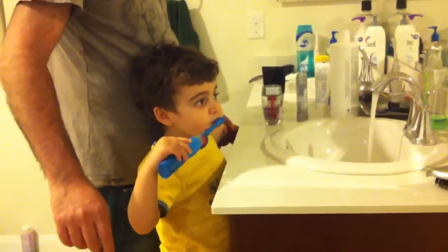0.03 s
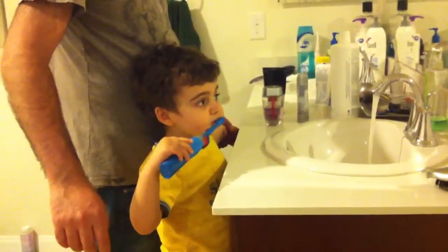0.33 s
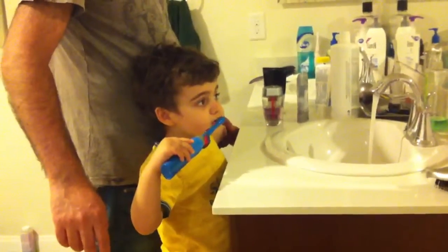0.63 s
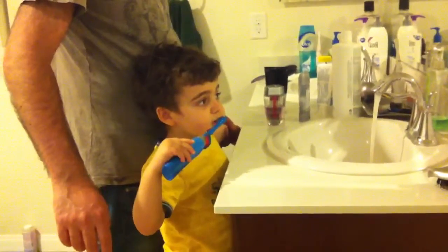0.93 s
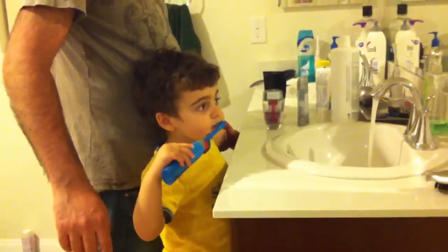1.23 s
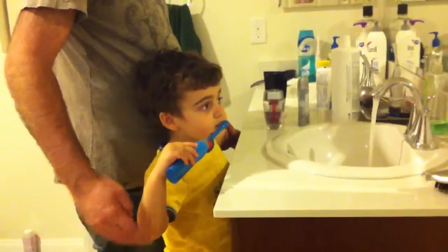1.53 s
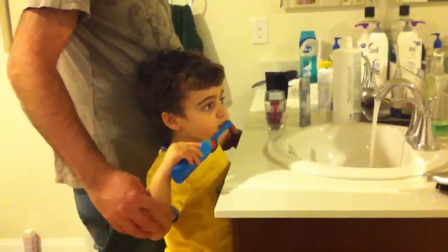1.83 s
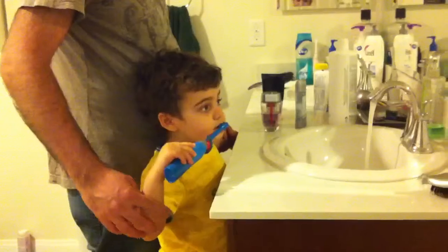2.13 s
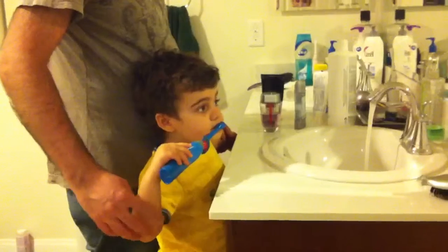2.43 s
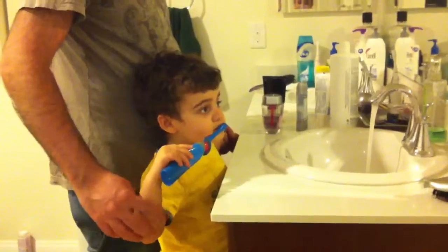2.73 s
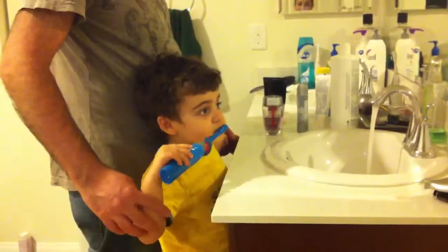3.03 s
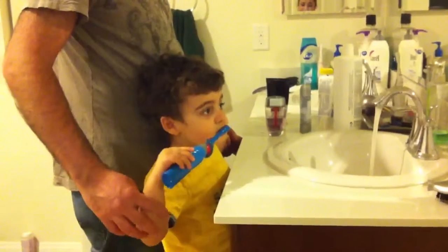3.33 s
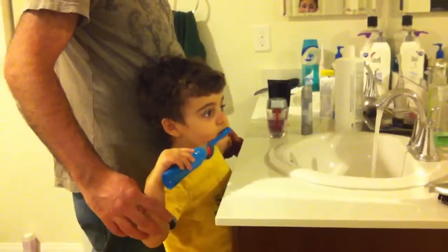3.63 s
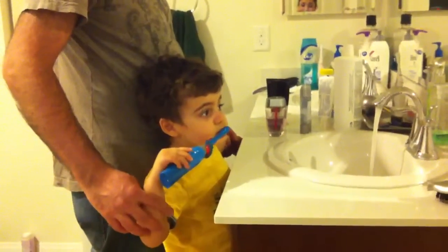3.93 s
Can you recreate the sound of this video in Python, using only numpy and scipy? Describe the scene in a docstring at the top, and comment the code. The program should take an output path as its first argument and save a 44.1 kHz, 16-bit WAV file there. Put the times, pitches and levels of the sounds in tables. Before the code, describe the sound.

A battery toothbrush buzzes throughout with a wavering gear whine and fast rattle. Alongside it, tap water hisses and spatters in the sink and gurgles down the drain, picked up by one microphone in a small bathroom.

```python
"""Battery toothbrush and running tap

A small bathroom, one microphone, far enough off to catch the room on knocks and spray. The brush runs in
a child's mouth: gears whine, the drive knocks four times a stroke and sags in speed when pressed, the
bristles scrub once a stroke. The tap hisses and spatters on the basin and gurgles in the drain.
Two soft bumps sound underneath."""
import sys
import numpy as np
from scipy import signal
from scipy.fft import rfft, irfft
from scipy.io import wavfile

SR = 44100
rng = np.random.default_rng(int(sys.argv[2]) if len(sys.argv) > 2 else 0)


def int16_out(signal):
    """Quantize to a 16-bit WAV file."""
    q = np.round(np.clip(np.atleast_2d(signal).T, -1, 1) * 32767)
    wavfile.write(sys.argv[1], SR, q.astype(np.int16))


N = 176400
T = np.arange(N) / SR

# speed of the brush: t/s, stroke rate/Hz
STROKE_RATE = [(0, 45.9), (.2, 45.85), (.35, 46.15), (.62, 45.6), (.88, 45.87), (1.0, 46.96), (1.1, 46.95),
               (1.22, 46.82), (1.5, 46.76), (1.7, 46.6), (1.82, 46.68), (1.98, 46.48), (2.15, 45.58),
               (2.3, 45.6), (2.46, 46.14), (2.64, 46), (2.73, 45.55), (2.83, 45.76), (2.95, 45.63),
               (3.08, 46), (3.22, 45.45), (3.41, 45.24), (3.52, 45.9), (3.62, 45.17), (3.68, 45.08),
               (3.79, 44.5), (3.9, 44.8), (4, 44.9)]


def toothbrush():
    """One motor drives gears, knocks and bristles; the whine grows as pressure slows it."""
    # gear whine: multiple of the stroke rate, level/dB
    whine_lines = [(26, -65.5), (27, -64), (28, -60.5), (29, -54), (30, -55.5), (31, -66.5), (32, -59),
                   (33, -73), (34, -64)]
    # shrill gear lines: multiple of the stroke rate, level/dB
    shrill_lines = [(45, -64), (48, -60.5), (49, -62), (55, -64.5), (57, -73.5), (59, -65), (60, -55),
                    (61, -58), (62, -57.5), (63, -68.5), (65, -59.5), (66, -73), (70, -63.5), (71, -64.5),
                    (72, -60), (117, -61), (118, -63), (120, -64), (143, -67.5), (146, -77), (150, -66)]
    free_speed_hz, whine_db, db_per_hz_sag, shrill_db = 46, -6.5, 3, -1.5
    speed = in_time(STROKE_RATE)
    strokes = np.cumsum(speed) / SR
    sag_hz = np.maximum(free_speed_hz - speed, 0)
    whine = gears(strokes, whine_lines, scatter=1.7, waver=0.27)
    whine *= 1 + 0.1 * drift(39.8)  # roughness
    whine *= from_db(whine_db + db_per_hz_sag * sag_hz)
    shrill = from_db(shrill_db) * gears(strokes, shrill_lines, scatter=2.73, waver=0.57)
    scrub = bristles(strokes)
    return whine + shrill + squeals(strokes) + rattle(strokes) + scrub


def gears(strokes, lines, scatter, waver):
    """Wavering lines locked to the stroke; with little phase scatter they throb once a stroke."""
    # sharp modes of the handle, lifting any line that slides through them: f/Hz, lift/dB
    modes = [(1332, 3.5), (1362, 3), (1550, 7), (2507, 11), (2708, 11), (2815, 4), (3214, 3), (3270, 12),
             (5350, 1)]
    mode_width_hz = 20
    out, speed = 0, in_time(STROKE_RATE)
    for multiple, db in lines:
        lift_db = sum(top / (1 + (2 * (multiple * speed - hz) / mode_width_hz) ** 2) for hz, top in modes)
        wobble = 1 + waver * (drift(4.2) + 1j * drift(10.0))
        phase = 2 * np.pi * multiple * strokes + scatter * rng.standard_normal()
        out += from_db(db + lift_db) * np.sqrt(2) * np.real(wobble * np.exp(1j * phase))
    return out


def squeals(strokes):
    """Single gear lines fade in, sing and fade out as the load on the brush changes."""
    # singing gear lines: start/s, length/s, multiple of the stroke rate, level/dB
    lines = [(.18, .4, 49, -57), (0.403, .5, 70, -51.5), (0.977, 0.17, 60, -60), (0.99, 0.38, 29, -58.5),
             (1.22, 0.22, 62, -57), (1.22, 0.39, 66, -50.5), (1.423, 0.63, 70, -62), (1.56, 0.42, 59, -50),
             (2.13, .25, 55, -52), (2.1, 0.34, 143, -60), (3.182, .2, 30, -49.5), (3.254, 0.2, 71, -44),
             (3.544, 0.12, 30, -47), (3.625, 0.28, 60, -47.5), (3.72, 0.24, 26, -59), (3.76, 0.11, 63, -64),
             (3.7, .27, 120, -56.5), (3.7, .27, 151, -55)]
    out, fade_s = 0, 0.047
    for start, length, multiple, db in lines:
        envelope = np.clip(np.minimum(T - start, start + length - T) / fade_s, 0, 1)
        waver = 1 + 0.25 * drift(13)
        out += from_db(db) * envelope * waver * np.sqrt(2) * np.sin(2 * np.pi * multiple * strokes)
    return out


def rattle(strokes):
    """Slightly uneven knocks of the drive, each trailed by a short chatter, ring the handle."""
    # knocks within one stroke: share of the stroke, level/dB
    knocks = [(.05, -5), (0.302, -12), (0.547, -8), (0.798, -10)]
    # ring of the plastic handle: f/Hz, level/dB
    handle = [(120, -87), (700, -25), (1150, -20), (1370, -16.5), (1700, -28), (2000, -16.5), (2350, -6),
              (2600, -12.5), (2780, -3.5), (3050, 0), (3280, -0.5), (3440, -8), (3750, -18.5), (4050, -9),
              (4700, -31.5), (7000, -28), (14000, -22.5)]
    # strength of the rattle: t/s, level/dB
    strength = [(0, -39), (.7, -40.5), (1.3, -38.5), (1.9, -39.5), (2.3, -41), (2.6, -37.5), (2.9, -41),
                (3.25, -39.5), (3.5, -39), (4, -41)]
    jitter_s, spread_db, chatter_s, chatter_db, trim_db = 0.00004, 1.4, 0.0021, 1, -4
    turns, clicks = np.arange(int(strokes[-1]) + 1), np.zeros(N)
    for share, db in knocks:
        times = np.interp(turns + share, strokes, T, right=2 * T[-1])
        times += jitter_s * rng.standard_normal(len(turns))
        sizes = from_db(db + spread_db * rng.standard_normal(len(turns)))
        inside = (times >= 0) & (times < T[-1])
        clicks[(times[inside] * SR).astype(int)] += sizes[inside]
    decays = signal.lfilter([1], [1, -np.exp(-1 / (chatter_s * SR))], clicks)
    chatter = from_db(chatter_db) * rms_one(decays * rng.standard_normal(N))
    ring = colour(rms_one(clicks - clicks.mean()) + chatter, handle)
    return from_db(in_time(strength) + trim_db) * bathroom(ring, wet_db=3.5)


def bristles(strokes):
    """Friction noise pulses once a stroke, strongest when the brush is pressed hard."""
    # spectrum of the bristles: f/Hz, level/dB
    spectrum = [(120, -34), (950, -21), (1150, -1.5), (1700, -6.5), (4800, -11.5), (5400, 2.5), (5900, 0.5),
                (6700, 2.5), (7400, -15), (15000, -23.5)]
    # strength of the scrubbing: t/s, level/dB
    strength = [(0, -51), (1.2, -60), (2, -59), (2.35, -54), (3.1, -55), (3.55, -55), (3.8, -47.5),
                (4, -49)]
    friction = rng.standard_normal(N) * (1 + 0.87 * np.cos(2 * np.pi * strokes))
    return from_db(in_time(strength)) * colour(friction, spectrum)


def tap():
    """The stream hisses on the basin; hiss and spray flutter together with the flow."""
    # spectrum of the stream on the basin: f/Hz, level/dB
    spectrum = [(25, -23), (55, -36), (85, -31), (125, -14), (200, -8), (450, -5.5), (650, -10.5),
                (1000, -7.5), (1500, 0), (1900, -3.5), (2600, 9.5), (3600, 2), (4100, 3), (4800, -1.5),
                (6500, 2), (8500, -0.5), (10000, -4), (12500, -9), (14000, -6.5), (15800, -13)]
    hiss_db, flutter_db = -42, 0.64
    flow = drift(10.5)
    hiss = from_db(hiss_db + flutter_db * flow) * colour(rng.standard_normal(N), spectrum)
    return hiss + spray(flow)


def spray(flow):
    """Droplets ring for a few cycles each; splashes throw mostly fine, high ones."""
    # colour of the droplets: f/Hz, gain/dB
    spectrum = [(100, -19), (1500, -24.5), (4000, 0.5), (8000, -2.5), (12500, -4), (15800, -34)]
    # brief splashes: t/s, lift/dB (weighted by droplet fineness)
    splashes = [(.19, 0), (.46, 5), (1.07, 3), (1.41, 6), (2.25, 7), (2.455, 9.5), (3.84, 6)]
    # strength of the spatter: t/s, level/dB
    strength = [(0, -47), (.8, -46), (1.2, -47), (1.6, -46.5), (2.1, -46), (2.38, -47.5), (2.62, -45),
                (2.92, -46), (3.2, -45.5), (3.5, -48), (3.75, -46), (4, -48.5)]
    drops_per_s, spread_db, splash_rise_s = 2500, 3.5, 0.014
    spurt_db, flutter_db, trim_db = 1.8, 0.5, 0.32
    drops = (rng.random(N) < drops_per_s / SR) * rng.choice([-1, 1], N)
    drops = drops * from_db(spread_db * np.minimum(rng.exponential(1, N), 4))
    pitches_hz = np.geomspace(2000, 15000, 12)
    pitch_index = rng.integers(0, len(pitches_hz), N)
    fineness = pitch_index / len(pitches_hz)
    lift_db = sum(db * swell(start, splash_rise_s) for start, db in splashes) + spurt_db * drift(28)
    drops *= from_db(fineness * lift_db)
    rings = sum(resonate(drops * (pitch_index == k), hz, 0.28 * hz) for k, hz in enumerate(pitches_hz))
    level = from_db(in_time(strength) + trim_db + flutter_db * flow)
    return level * bathroom(colour(rings, spectrum), wet_db=1.5)


def drain():
    """Falling water keeps the air in the drain ringing; each larger gulp briefly takes over."""
    # larger gulps: t/s, peak level/dB, rise/s
    large_gulps = [(.05, -47.5, 0.025), (.768, -44.5, 0.015), (1.179, -45, 0.0047), (1.272, -48.5, 0.0087),
                   (1.325, -46.5, 0.014), (1.39, -48, 0.011), (2.82, -49, .02), (2.875, -48, 0.022),
                   (3.052, -46, 0.0098), (3.63, -50, 0.023)]
    # brief lift above the usual pitch: t/s, lift/Hz
    pitch_lift = [(.2, 0), (.52, 31), (.68, 0)]
    # ringing about its usual strength: t/s, level/dB
    strength = [(0, -1.5), (.5, -2), (1.0, -4), (1.3, -0.5), (1.7, 2.5), (1.9, -1.5), (2.5, 0), (3.2, -2),
                (3.6, 2), (3.88, -4.5), (4, 2)]
    pitch_hz, width_hz, ring_db = 311.5, 42.4, -57.5
    air = drift(width_hz / 2) + 1j * drift(width_hz / 2)
    air /= np.sqrt(1 + (0.22 * abs(air)) ** 2)  # evens out the peaks
    level = from_db(ring_db + in_time(strength))
    gulps = sum(from_db(db) * swell(start, rise_s) for start, db, rise_s in large_gulps)
    hollow = level * air / np.std(air.real)
    hollow /= 1 + (gulps / (2 * level)) ** 2  # gives way to each gulp
    phase = 2 * np.pi * np.cumsum(pitch_hz + in_time(pitch_lift)) / SR
    return np.real((hollow + gulps) * np.exp(1j * phase))


def bumps():
    """Dull, soft thuds in the background, each with a short low ring."""
    # soft bumps: t/s, level/dB
    hits = [(1.27, -57), (3.785, -55)]
    # spectrum of a thud: f/Hz, level/dB
    spectrum = [(50, -46), (90, -27), (140, -8), (175, 7.5), (260, 2), (450, 4.5), (700, -4), (1500, -47)]
    ring_hz, ring_db = 122, -12.5
    thud_envelope = sum(from_db(db) * swell(start, rise_s=0.018) for start, db in hits)
    ring_envelope = sum(from_db(db + ring_db) * swell(start, rise_s=0.045) for start, db in hits)
    thuds = thud_envelope * colour(rng.standard_normal(N), spectrum)
    return thuds + ring_envelope * np.sin(2 * np.pi * ring_hz * T)


def bathroom(x, wet_db, t60_s=0.24):
    """Direct sound plus the short, dense tail of a small room; rms 1."""
    t = T[:SR // 2]
    tail = rng.standard_normal(len(t)) * from_db(-60 * t / t60_s)
    room = irfft(rfft(x) * rfft(tail / np.linalg.norm(tail), N), N)
    return rms_one(x + from_db(wet_db) * room)


def from_db(db):
    """Decibels to gain."""
    return 10 ** (np.asarray(db) / 20)


def rms_one(x):
    """Scale to rms 1."""
    return x / np.sqrt(np.mean(x ** 2) + 1e-20)


def in_time(rows):
    """Join (t/s, value) rows into a curve at every sample."""
    return np.interp(T, *np.transpose(rows))


def swell(start, rise_s):
    """An envelope that swells to height 1 and dies away."""
    age = np.maximum(T - start, 0) / rise_s
    return age * np.exp(1 - age)


def drift(rate_hz):
    """Random wander, mostly slower than rate_hz; rms 1."""
    f = np.arange(N // 2 + 1) * SR / N
    return rms_one(irfft(rfft(rng.standard_normal(N)) * (f > 0) / (1 + (f / rate_hz) ** 2), N))


def colour(x, points):
    """Causal (minimum-phase) filter through (f/Hz, gain/dB) points; rms 1."""
    hz, db = np.transpose(points)
    f = np.maximum(np.arange(N // 2 + 1) * SR / N, 1)
    gain = from_db(np.interp(np.log(f), np.log(hz), db))
    causal_cepstrum = 2 * irfft(np.log(gain), N) * (np.arange(N) < N // 2)
    return rms_one(irfft(rfft(x) * np.exp(rfft(causal_cepstrum)), N))


def resonate(x, hz, width_hz):
    """One resonance with gain 1 at its peak."""
    r = np.exp(-np.pi * width_hz / SR)
    feedback = [1, -2 * r * np.cos(2 * np.pi * hz / SR), r * r]
    return signal.lfilter(np.array([1, 0, -1]) * (1 - r * r) / 2, feedback, x)


def scene():
    """Everything reaches one microphone, the same in both channels."""
    mono = toothbrush() + tap() + drain() + bumps()
    return np.array([mono, mono])


def record(dry):
    """A steep high cut takes off the very top."""
    cutoff_hz = 15750
    return signal.sosfiltfilt(signal.ellip(12, .05, 60, cutoff_hz, fs=SR, output="sos"), dry)


dry = scene()
out = record(dry)
int16_out(out)
```